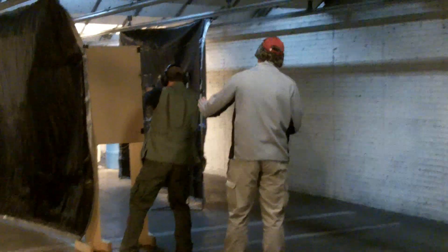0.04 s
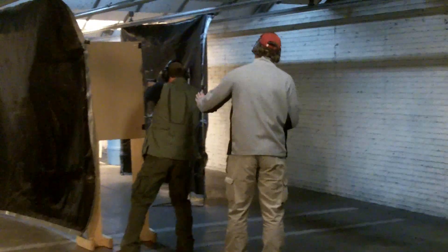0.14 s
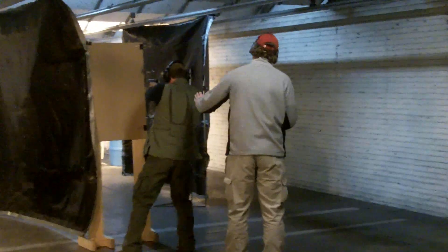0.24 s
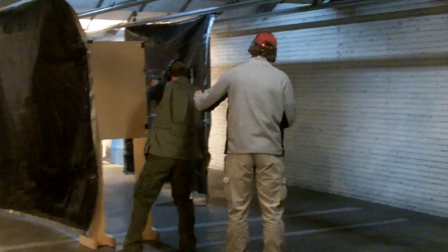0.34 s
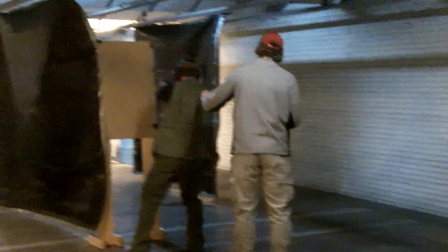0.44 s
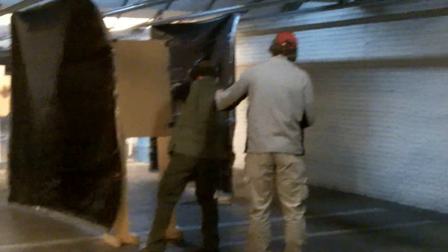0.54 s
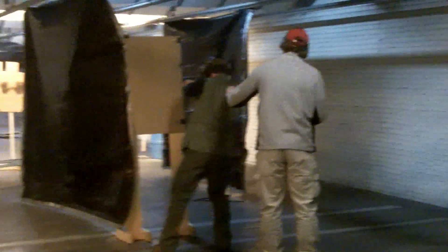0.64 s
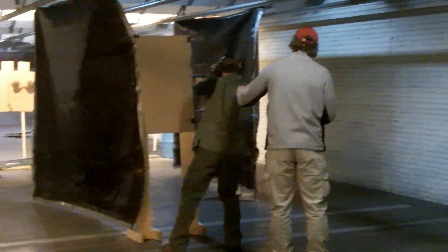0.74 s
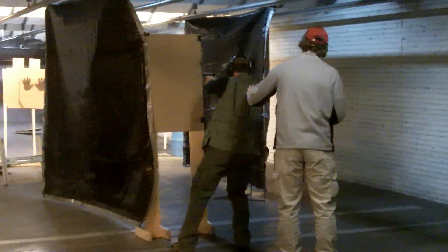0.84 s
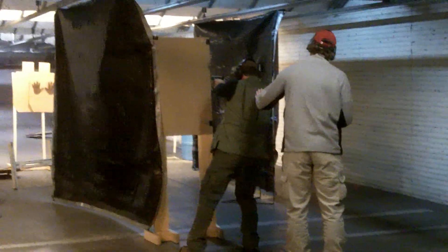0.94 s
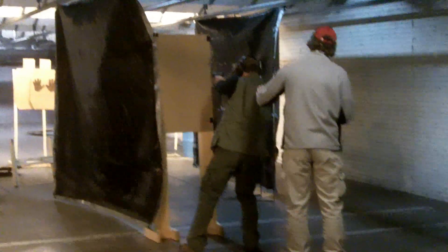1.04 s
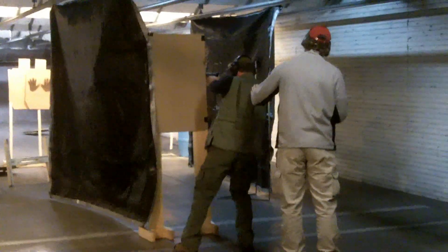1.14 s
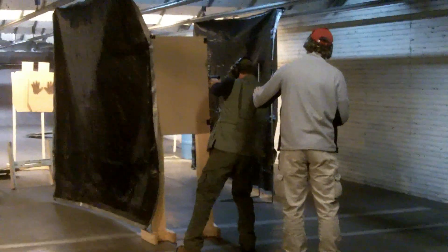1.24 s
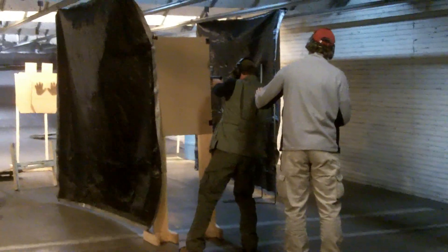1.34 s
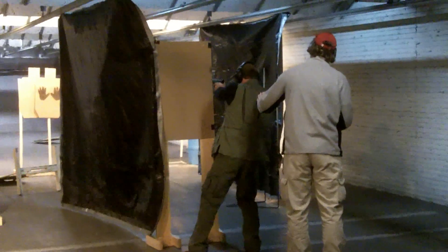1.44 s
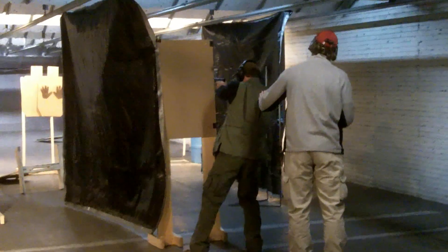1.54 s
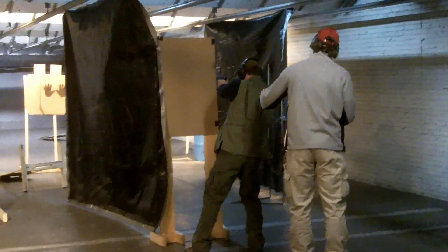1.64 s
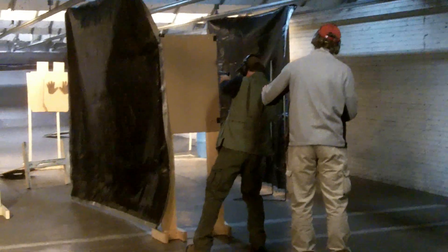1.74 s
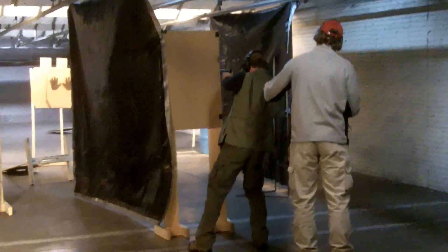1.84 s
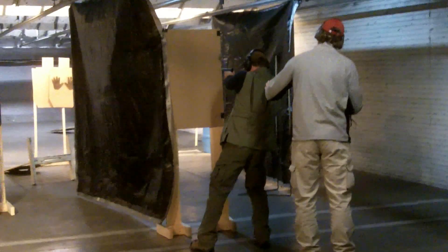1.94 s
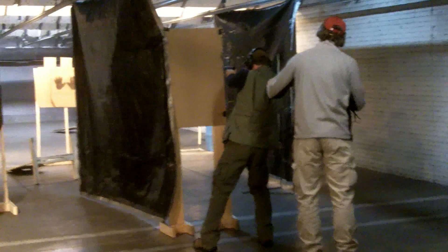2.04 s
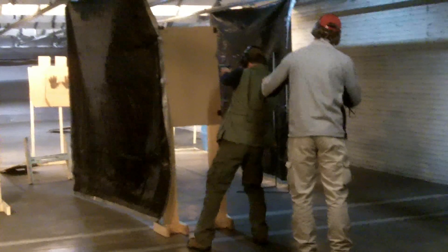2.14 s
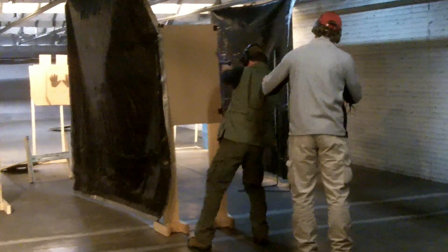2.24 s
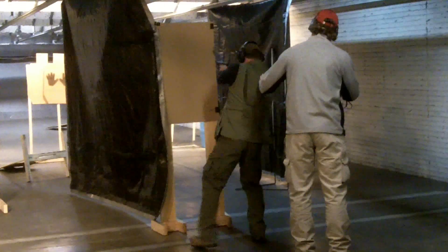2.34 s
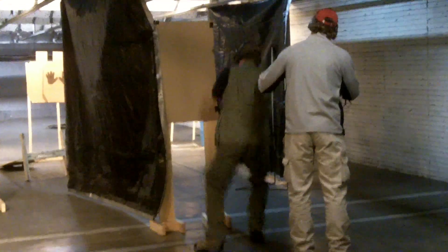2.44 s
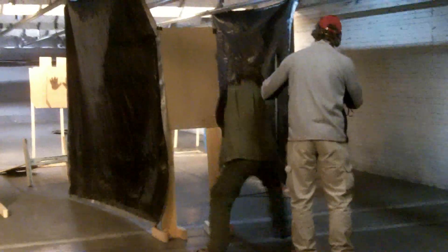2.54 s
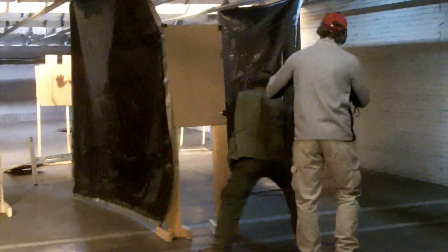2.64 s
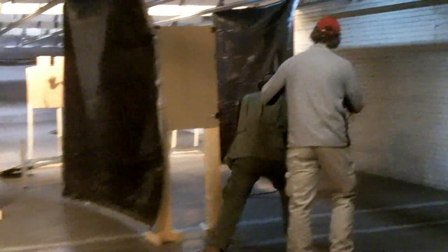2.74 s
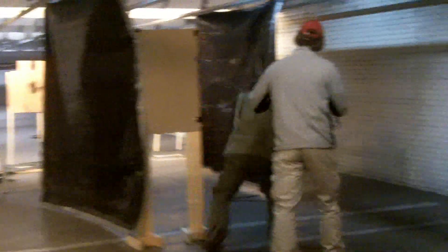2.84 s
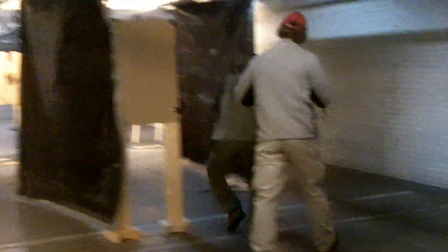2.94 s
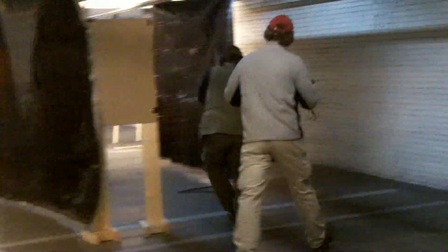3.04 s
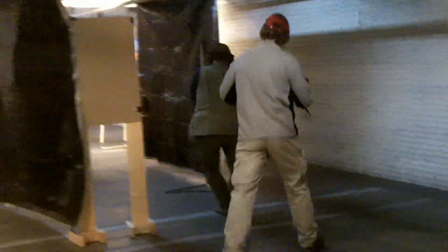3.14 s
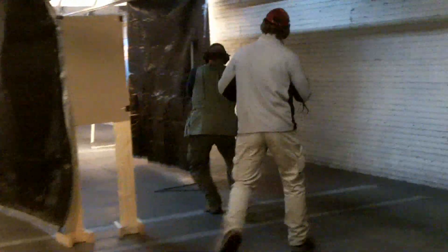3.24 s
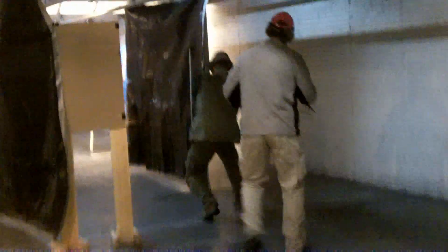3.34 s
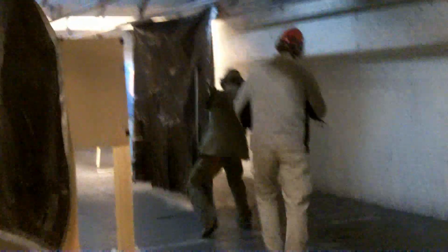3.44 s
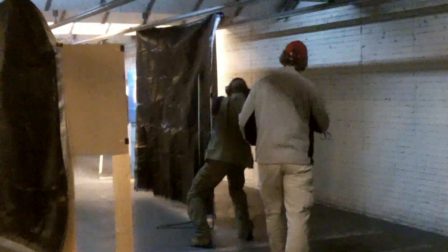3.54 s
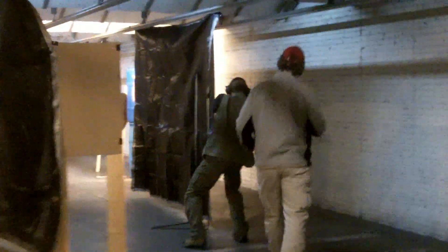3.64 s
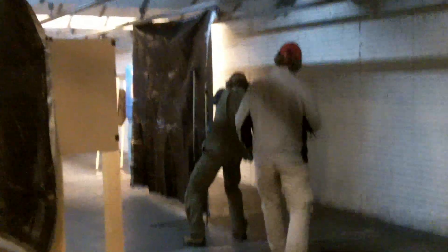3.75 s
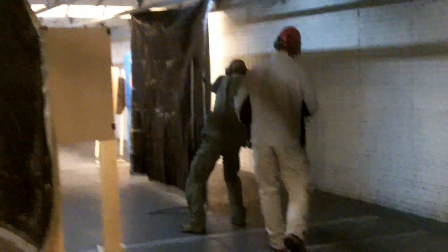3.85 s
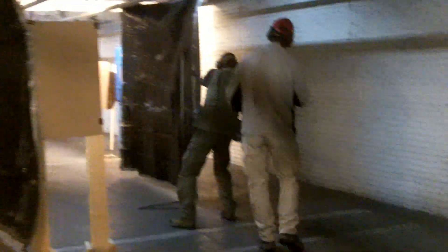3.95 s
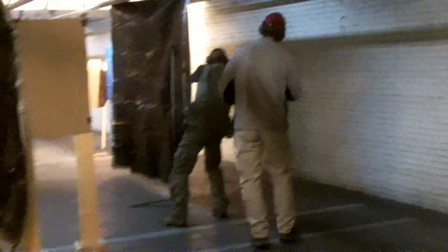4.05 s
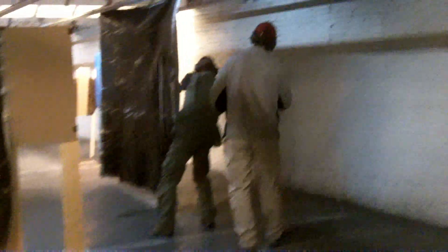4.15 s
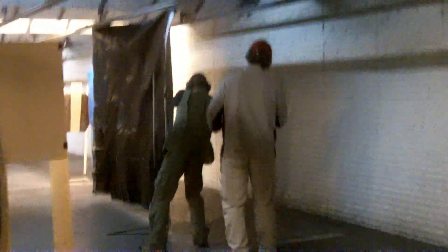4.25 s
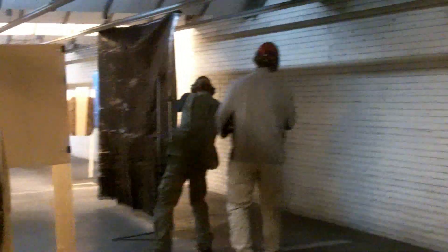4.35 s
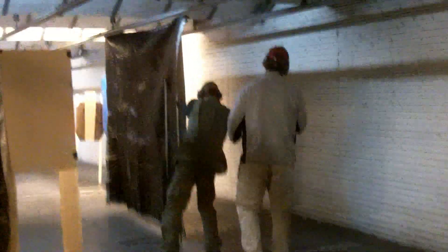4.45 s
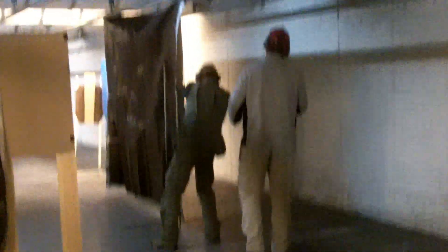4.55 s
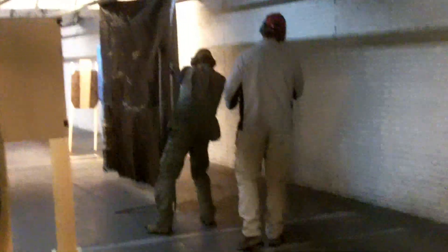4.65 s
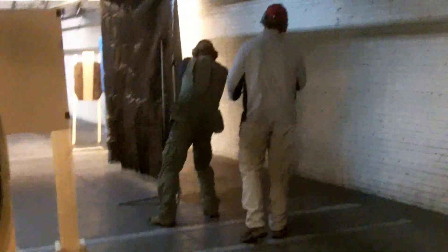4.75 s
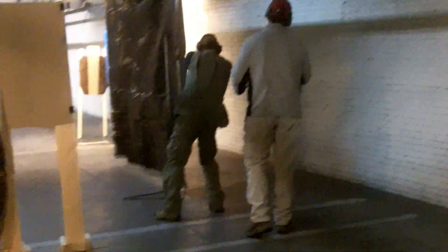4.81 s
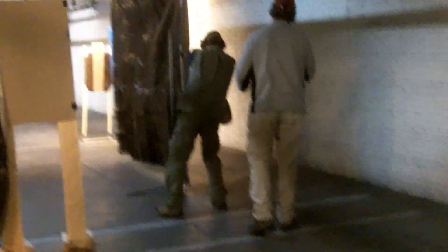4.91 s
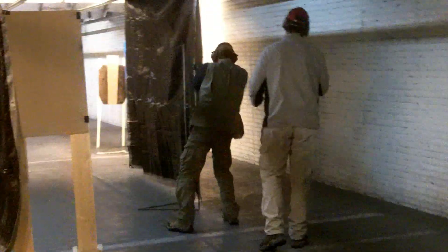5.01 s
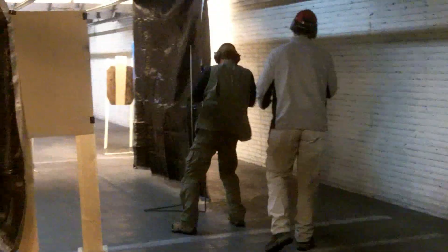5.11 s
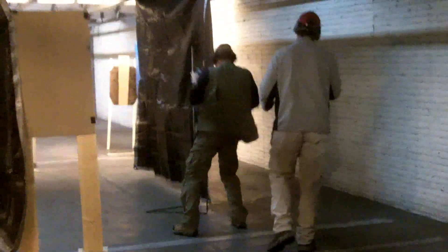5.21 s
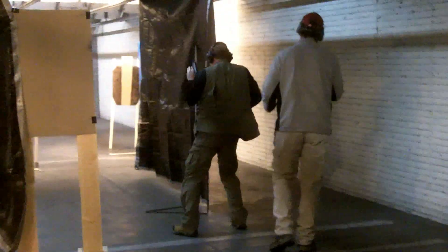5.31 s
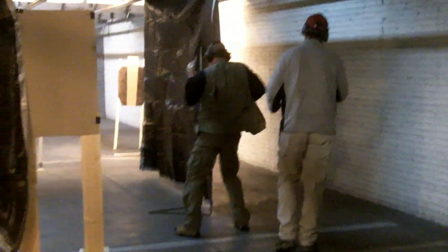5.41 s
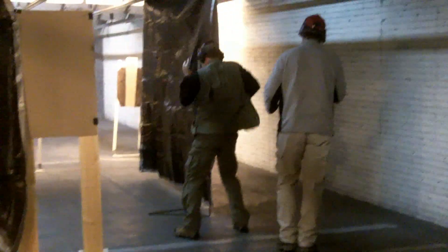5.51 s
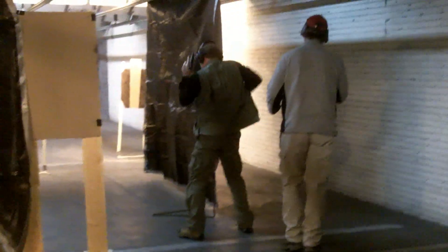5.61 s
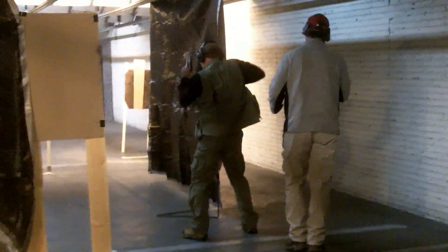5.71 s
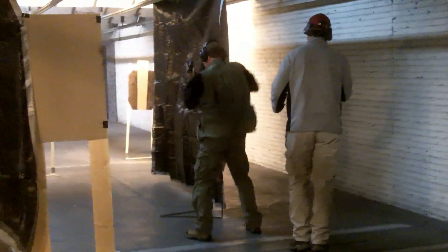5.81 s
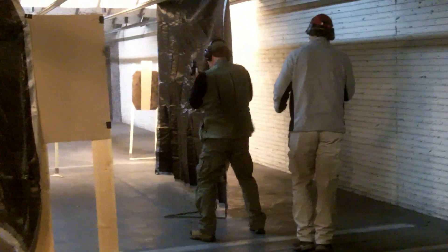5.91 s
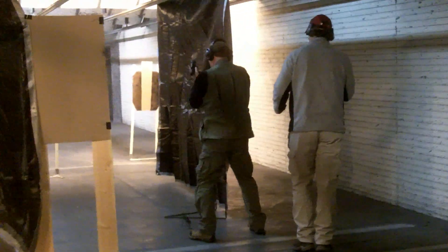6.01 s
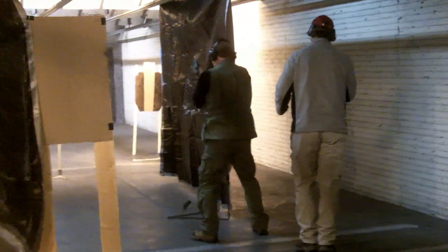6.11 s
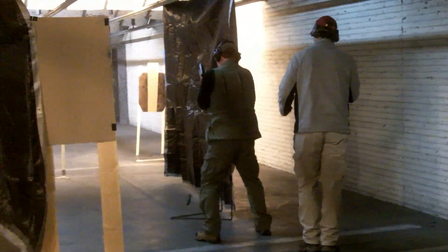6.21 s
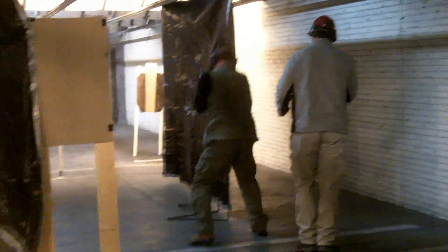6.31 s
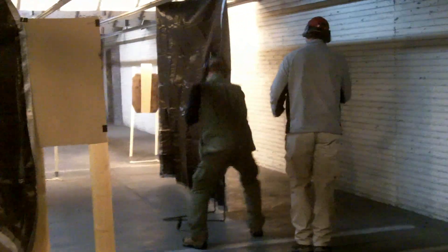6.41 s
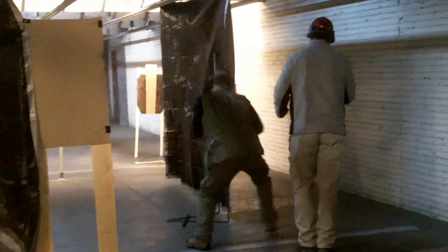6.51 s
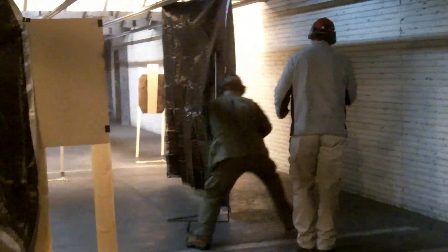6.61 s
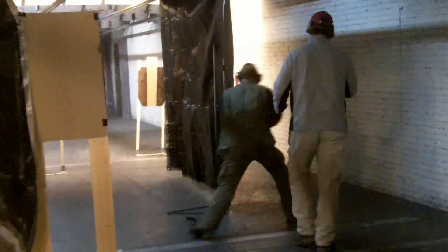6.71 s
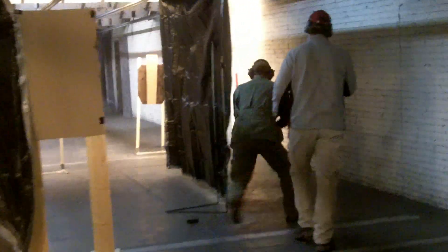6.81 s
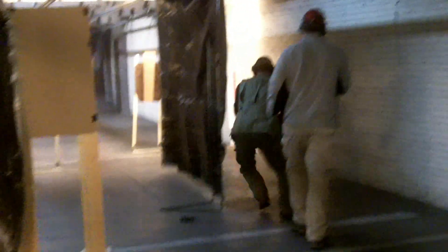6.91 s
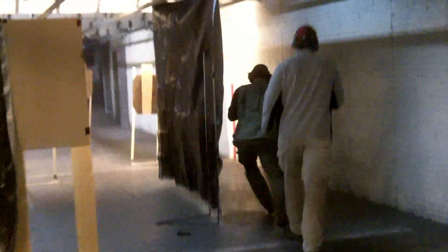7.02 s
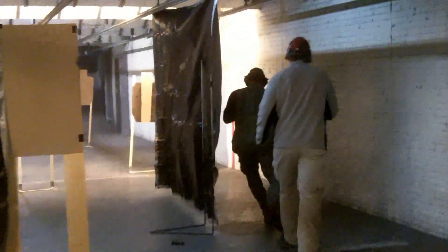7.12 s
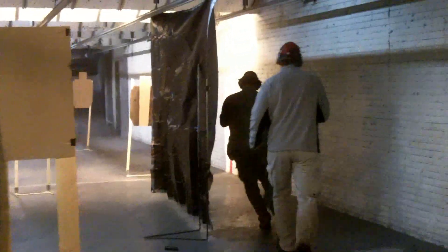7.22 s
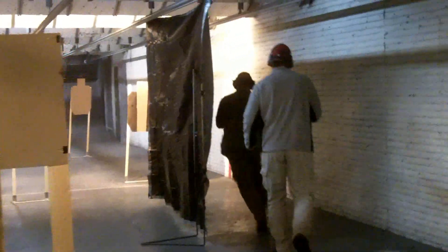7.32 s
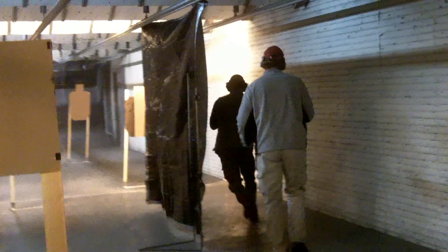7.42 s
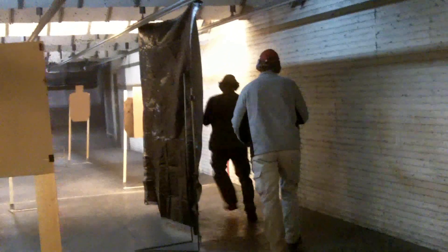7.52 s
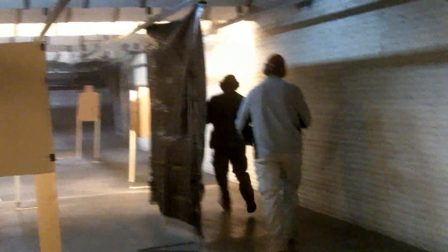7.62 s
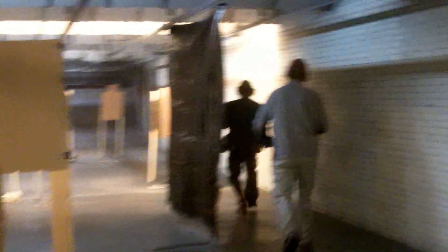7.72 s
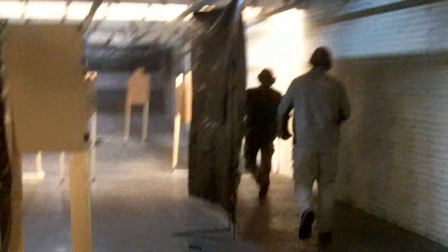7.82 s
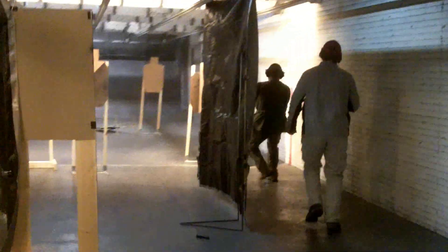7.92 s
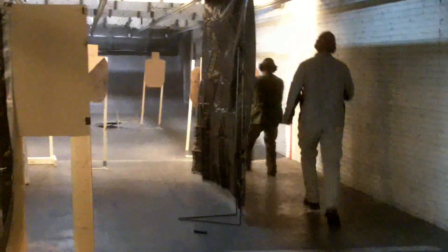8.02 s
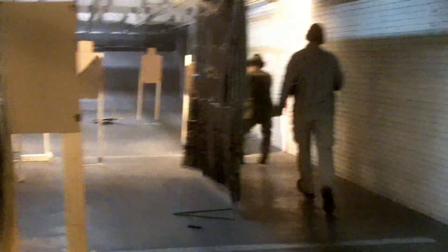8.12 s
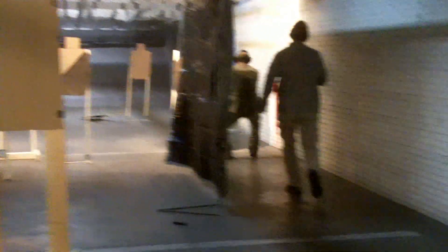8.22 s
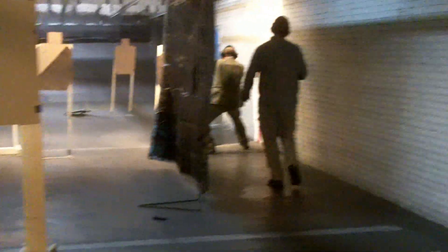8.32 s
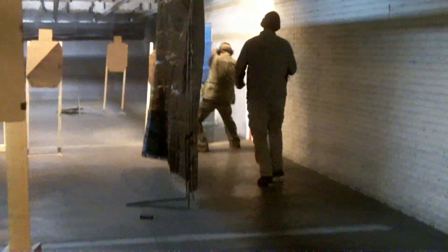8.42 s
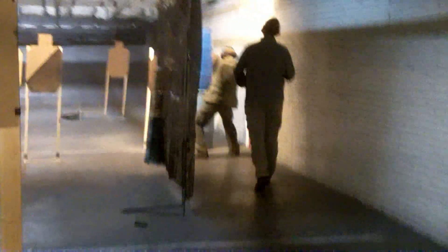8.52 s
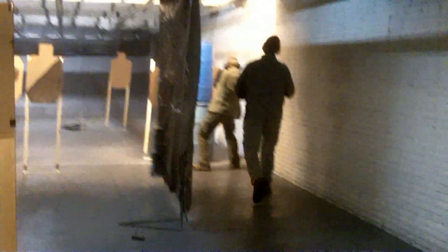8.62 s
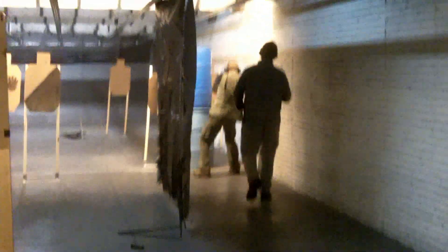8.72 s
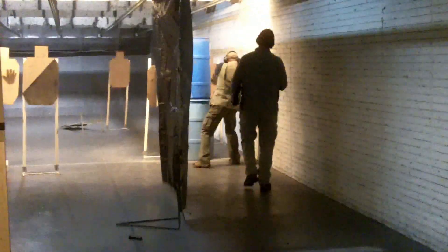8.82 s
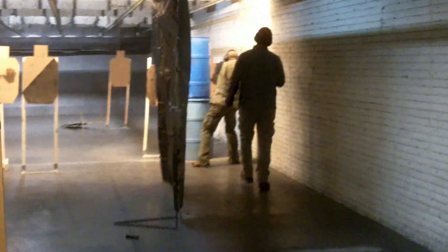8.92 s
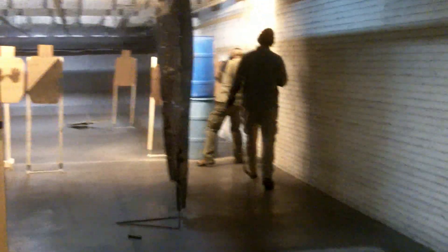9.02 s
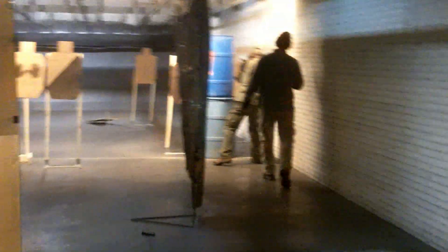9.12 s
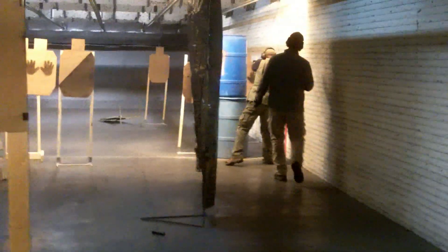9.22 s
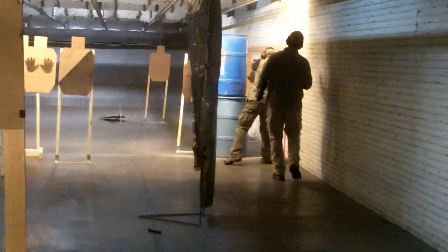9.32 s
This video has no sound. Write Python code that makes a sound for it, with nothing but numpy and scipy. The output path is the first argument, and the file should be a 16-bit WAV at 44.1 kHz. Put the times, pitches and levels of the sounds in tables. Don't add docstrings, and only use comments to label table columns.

```python
import sys
import numpy as np
from scipy import signal
from scipy.io import wavfile

SR = 44100
rng = np.random.default_rng(int(sys.argv[2]) if len(sys.argv) > 2 else 0)


def elevation(decibels):
    levels = np.asarray(decibels, float)
    return 10 ** (levels / 20)


def dump(signal):
    limited = np.clip(np.atleast_2d(signal).T, -1, 1)
    pcm = np.round(limited * 32767).astype(np.int16)
    wavfile.write(sys.argv[1], SR, pcm)


N = 412776

# start_s, peak_db, far_wall_slap_db, forerunner_db
PRIOR_SHOT = [
    (-0.048, 2.5, 0.5, -40),
]
SHOTS = [
    (0.5, 2.27, -2, -24.5),
    (1.854, 2.7, -2.5, -29),
    (2.368, 3.37, -2, -21),
    (4.332, 4.03, -1.5, -29),
    (4.753, 3.65, -11, -31),
    (5.018, 3.37, -5, -21.5),
    (9.275, 1.33, -7, -19),
]


def rms_one(x):
    return x / np.sqrt(np.mean(x ** 2) + 1e-20)


def bandpass(x, low_hz, high_hz, order):
    return signal.sosfilt(signal.butter(order, [low_hz, high_hz], "band", fs=SR, output="sos"), x)


def at_hz(points, hz, column=1):
    points = np.array(points)
    return np.interp(np.log(hz), np.log(points[:, 0]), points[:, column])


def clicks(start_s, sizes, size=N):
    out = np.full(size, 1e-18)
    np.add.at(out, np.round(np.asarray(start_s) * SR).astype(int), sizes)
    return out


def dying(power, t60_s):
    return signal.lfilter([1], [1, -elevation(-120 / (t60_s * SR))], power)


def ring(x, hz, t60_s):
    r = elevation(-60 / (t60_s * SR))
    w = 2 * np.pi * hz / SR
    return signal.lfilter([0, np.sin(w)], [1, -2 * r * np.cos(w), r * r], x)


def drift(rate_hz):
    knots_per_s = 40
    knots = rng.standard_normal(int(N / SR * knots_per_s) + 3)
    r = np.exp(-2 * np.pi * rate_hz / knots_per_s)
    smooth = rms_one(signal.lfilter([1], [1, -r], knots))
    return np.interp(np.arange(N) / SR * knots_per_s, np.arange(len(knots)), smooth)


def bands(size):
    white = rng.standard_normal((2, size))
    edges_hz = 18 * 2 ** (np.arange(31) / 3)
    for k, (low_hz, high_hz) in enumerate(zip(edges_hz, edges_hz[1:])):
        yield np.sqrt(low_hz * high_hz), bandpass(white[k % 2], low_hz, high_hz, 2)


def hall_power(hz, kicks):
    # band_hz, t60_s, slow_tail_db, build_up_s
    hall_decay = [(30, 1.1, -33, 0.011), (81.6, 0.39, -8, 0.005), (220, 1.45, -8.5, 0.024),
                  (606, 0.99, -13.5, 0.022), (1490, 0.96, -16.5, 0.019), (2930, 0.93, -26.5, 0.005),
                  (5530, 0.69, -50, 0.0049), (8100, 0.47, -43, 0.0035), (11820, 0.37, -59, .004),
                  (16200, 0.16, -64.5, .004)]
    t60_s, slow_db, rise_s = (at_hz(hall_decay, hz, column=k) for k in (1, 2, 3))
    slow_t60_ratio = 2.196
    decay = dying(kicks, t60_s) + elevation(2 * slow_db) * dying(kicks, slow_t60_ratio * t60_s)
    r = np.exp(-1 / (rise_s * SR))
    return signal.lfilter([1 - r], [1, -r], decay)


def shots():
    # band_hz, level_db_per_hz
    blast_low = [(20, -4), (60, -5.5), (140, -5.5), (230, -6), (400, -6), (600, -2.5), (850, -3.5),
                 (1200, -6), (1700, -10), (2400, -13), (3300, -19)]
    blast_top = [(5000, -18), (7000, -18.5), (10000, -21), (16000, -8.5)]
    slap_delay_s, slap_t60_s = 0.116, 0.033
    run_in = SR // 10
    start_s, peak_db, slap_db, early_db = np.transpose(list(PRIOR_SHOT) + list(SHOTS))
    start_s = start_s + run_in / SR
    size = N + run_in + SR // 5
    power = elevation(2 * peak_db)
    diffuse = 0
    for hz, band in bands(size):
        tint = np.minimum(hz / 3000, 6000 / hz)
        slap_kicks = clicks(start_s + slap_delay_s, power * elevation(2 * slap_db) * tint, size=size)
        total = hall_power(hz, clicks(start_s, power, size=size)) + dying(slap_kicks, slap_t60_s)
        diffuse = diffuse + elevation(at_hz(list(blast_low) + list(blast_top), hz)) * band * np.sqrt(total)
    n_wave = np.linspace(1, -1, 26)
    blast = np.convolve(clicks(start_s, elevation(peak_db), size=size), n_wave)[:size]
    swell = dying(clicks(start_s, elevation(2 * early_db), size=size)[::-1], 0.048)[::-1]
    early = bandpass(rng.standard_normal(size), 500, 3000, 2) * np.sqrt(swell)
    return (elevation(19.0) * diffuse + elevation(-1) * blast + elevation(3) * early)[run_in:run_in + N]


def rumble_dip_db():
    dip_db, hold_s, ease_db_s = 8, 0.45, 20.5
    shot_s = np.array(list(PRIOR_SHOT) + list(SHOTS))[:, 0]
    t = np.arange(N) / SR
    since_s = t - shot_s[np.searchsorted(shot_s, t) - 1]
    return np.clip(dip_db - ease_db_s * (since_s - hold_s), 0, dip_db)


def ventilation():
    # band_hz, level_db_per_hz
    air_low = [(60, -40), (100, -4.5), (150, -8), (220, 0), (290, -16.5), (400, -30.5), (600, -29.5),
               (850, -32), (1200, -34.5), (2000, -36), (3300, -51.5)]
    air_top = [(5000, -47.5), (7000, -51.5), (10000, -61.5), (16000, -65.5)]
    # mode_hz, width_hz, level_db
    ducts = [(219.46, 8.8, -3), (114.5, 7.6, -10.5), (760, 14, -27)]
    # time_s, handling_db, ventilation_db
    carried = [
        (0, -41, -19.5),
        (1.5, -36.5, -29),
        (3.199, -36, -32),
        (4.0, -32, -27),
        (5.8, -37.5, -26),
        (6.598, -34, -30),
        (7.2, -30.5, -27.5),
        (8.1, -32, -26),
        (9.36, -31, -29.5),
    ]
    time_s, hands_db, air_db = np.transpose(carried)
    t = np.arange(N) / SR
    hands_db, air_db = (np.interp(t, time_s, db) for db in (hands_db, air_db))
    air = 0
    for hz, band in bands(N):
        wander_db = 2.85 * drift(1.7) * (hz < 400)
        air = air + elevation(at_hz(list(air_low) + list(air_top), hz) + wander_db) * band
    air = rms_one(air)
    for hz, width_hz, level_db in ducts:
        t60_s = 3.7 / width_hz
        tone = ring(ring(rng.standard_normal(N), hz, t60_s), hz, t60_s)
        air += elevation(level_db + 1.1 * drift(1.5)) * rms_one(tone)
    hands = rms_one(bandpass(rng.standard_normal(N), 18, 75, 2))
    hands_db = hands_db - rumble_dip_db() + 1.8 * drift(3.3)
    return elevation(air_db - 3.5) * air + elevation(hands_db) * hands


def cases():
    # start_s, peak_db
    ticks = [(1.207, -36), (1.217, -34), (1.235, -40), (1.325, -44), (1.3503, -52), (1.4856, -48),
             (1.617, -44), (1.716, -29), (1.727, -33), (3.0894, -47), (3.153, -34.5), (3.486, -44),
             (3.517, -39.5), (3.811, -41), (3.870, -30.5), (3.9294, -50), (5.702, -42), (5.9615, -26),
             (6.127, -39), (6.355, -17), (6.498, -36), (6.572, -20), (6.729, -25.5), (6.739, -33),
             (6.9461, -31), (7.2374, -43), (7.7, -35), (8.4602, -47), (9.165, -41), (9.179, -42)]
    # (start_s, peak_db)
    tubes = [
        (10800, [(1.4865, -58), (1.6332, -57), (1.6886, -51), (1.728, -44), (1.7873, -45)]),
        (10750, [(3.0914, -43), (3.1552, -51), (3.4874, -41), (3.5184, -47), (3.7184, -54), (3.7564, -46), (3.8107, -39), (3.931, -39), (4.1505, -57), (4.2394, -58)]),
        (10540, [(5.462, -50), (6.1285, -36), (6.19, -60), (6.5644, -37), (6.633, -56), (6.8284, -39), (6.995, -45), (7.3094, -53)]),
        (10000, [(5.9623, -54), (6.4996, -44), (6.755, -65), (6.9511, -34), (7.017, -55), (7.1412, -45), (7.2514, -55)]),
    ]
    # start_s, peak_db, mode_hz
    upper_rings = [
        (1.73, -53, 12000),
        (4.135, -58, 11650),
        (4.14, -64, 8740),
        (3.565, -64, 6840),
        (7.4, -51, 5060),
    ]
    ring_t60_s, strike_s, beat_hz = 0.25, 0.0018, 55
    start_s, peak_db = np.transpose(ticks)
    crack = bandpass(rng.standard_normal(N), 4700, 6800, 2)
    crack += elevation(-10.5) * bandpass(rng.standard_normal(N), 2500, 13000, 1)
    tick = crack * np.sqrt(dying(clicks(start_s, elevation(2 * peak_db + 6)), 0.03))

    strikes = []
    for hz, bounces in tubes:
        stops = [later[0] for later in bounces[1:]] + [N / SR]
        strikes += [(s, db, hz, stop) for (s, db), stop in zip(bounces, stops)]
    strikes += [(*row, N / SR) for row in upper_rings]
    rings = np.zeros(N)
    for (s, db, hz, stop), c in zip(strikes, rng.random((len(strikes), 6))):
        t = np.arange(min(round((stop - s) * SR), SR // 2)) / SR
        modes = 0
        for k in range(3):
            phase = 2 * np.pi * ((hz + beat_hz * (k - 1)) * t + c[k + 3])
            modes = modes + np.sqrt(c[k]) * np.sin(phase)
        edges = np.clip(np.minimum(t, stop - s - t) / strike_s, 0, 1)
        rings[round(s * SR):][:len(t)] += elevation(db - 60 * t / ring_t60_s) * modes * edges
    return tick + elevation(1.0) * rings, elevation(-1.5) * tick + elevation(1.5) * rings


def boots():
    # start_s, length_s, level_db
    scuffs = [(3.695, .025, -41), (3.745, .03, -45), (3.79, .05, -49), (4.19, .08, -53), (4.315, .02, -42),
              (6.363, .015, -18.5), (6.66, 0.091, -39), (6.87, .1, -40), (7.097, 0.072, -39.5),
              (7.24, .05, -36.5), (7.364, 0.076, -38)]
    # start_s, peak_db
    steps = [
        (3.87, -48),
        (4.157, -48),
        (7.646, -40.5),
        (7.884, -38.5),
        (8.076, -35),
        (8.12, -48),
        (8.53, -49.5),
        (8.775, -42),
    ]
    rise_db_s, fall_db_s = 1498, 249
    start_s, peak_db = np.transpose(steps)
    knock = bandpass(rng.standard_normal(N), 500, 2900, 3)
    knock *= np.sqrt(dying(clicks(start_s, elevation(2 * peak_db)), 0.1))

    grain_db = 4 * np.minimum(rng.exponential(1, N), 3) * (rng.random(N) < 0.05)
    grit = rms_one(bandpass(rng.standard_normal(N) * elevation(grain_db), 1800, 8000, 2))
    t = np.arange(N) / SR
    grit += elevation(-5) * rms_one(ring(grit, 2276, 0.08)) * (t > 7)
    drag = 0
    for s, length_s, db in scuffs:
        rise_db = rise_db_s * np.maximum(s - t, 0)
        fall_db = fall_db_s * np.maximum(t - s - length_s, 0)
        drag = drag + elevation(db - rise_db - fall_db)
    grit *= drag
    return elevation(6.0) * knock + elevation(-9) * grit, elevation(8) * knock + elevation(-16.5) * grit


def magazine():
    # start_s, peak_db, low_mode_hz, low_mode_db
    bounces = [(6.1898, -16, 2120, 1), (6.1965, -6.5, 3290, -5), (6.2048, -14, 2200, 0),
               (6.214, -22, 2290, -6), (6.3812, -10, 1625, -2.5), (6.387, -7, 1540, -7),
               (6.3932, -12, 1770, -3), (6.6328, -16, 2270, 1), (6.642, -17, 1950, -1.5),
               (6.8276, -15, 905, -8.5), (6.8355, -17, 2260, -5), (6.849, -25, 2000, -5),
               (7.0168, -11.5, 1014, -11), (7.0302, -18, 2260, -14), (7.2489, -29, 2270, -1)]
    # mode_hz, level_db, t60_s
    shell = [(2270, -26, 0.13), (2620, -8, 0.024), (3380, -12, 0.044), (4990, -40, 0.0043),
             (5800, -5, 0.039), (6450, 0.5, 0.049), (6740, 9, .012), (8100, 5, .015), (8660, -27, 0.0085),
             (11100, -8, .01)]
    low_t60_s, rattle_t60_s, size = 0.047, 0.099, 4096
    hall_db, skid_away_db_s = -4, 1
    dry = np.zeros(N)
    chance = rng.standard_normal((len(bounces), 2, len(shell)))
    rattle = bandpass(rng.standard_normal((len(bounces), size)), 900, 9000, 1)
    kick = clicks([0], 0.52, size=size)
    for (s, db, low_hz, low_db), (loud, shift), noise in zip(bounces, chance, rattle):
        modes = 0
        for (hz, mode_db, t60_s), c, d in zip(shell, loud, shift):
            modes = modes + elevation(mode_db + 3 * c) * ring(kick, hz * (1 + 0.03 * d), t60_s)
        hit = elevation(-16) * modes
        hit += elevation(low_db + 0.5) * ring(kick, low_hz, low_t60_s)
        hit += elevation(2.0) * noise * dying(kick, rattle_t60_s)
        dry[round(s * SR):][:size] += elevation(db) * hit
    since_s = np.arange(N) / SR - bounces[0][0]
    return elevation(-0.5) * dry, elevation(hall_db + skid_away_db_s * since_s) * dry


def hall(x):
    kick = clicks([0.003], 1, size=SR)
    answer = sum(band * np.sqrt(hall_power(hz, kick)) for hz, band in bands(SR))
    return signal.oaconvolve(x, answer / np.sqrt(np.sum(answer ** 2)))[:N]


def scene():
    case, case_feed = cases()
    boot, boot_feed = boots()
    steel, steel_feed = magazine()
    small = case + boot + steel + hall(case_feed + boot_feed + steel_feed)
    return (shots() + ventilation() + small)[None]


def top_cut(x):
    return signal.sosfilt(signal.butter(12, 16470, fs=SR, output="sos"), x)


def record(dry):
    x = signal.lfilter(*signal.iirnotch(4250, 2.2, fs=SR), dry)
    x = x + elevation(4.0) * signal.lfilter(*signal.iirpeak(6050, 4.5, fs=SR), x)
    x = signal.sosfilt(signal.butter(2, 7500, fs=SR, output="sos"), x)

    over_db = np.clip(20 * np.log10(np.abs(x[0]) + 1e-9) + 14, 0, 9.0)
    over_db[0] = over_db.max()
    creep_db = 11.16 * np.arange(N) / SR
    drop_db = np.maximum.accumulate(over_db + creep_db) - creep_db
    smooth_db = signal.lfilter([0.008], [1, -0.992], drop_db, zi=[drop_db[0]])[0]
    x = x * elevation(-smooth_db)

    x = np.clip(x, -1.15, 0.84)
    x = x + elevation(-79.5) * rng.standard_normal(x.shape)
    x = signal.lfilter(*signal.butter(1, 16, "high", fs=SR), x)
    x = np.clip(x, -1.03, 1.03)
    x = signal.sosfilt(signal.cheby2(14, 45, 15700, fs=SR, output="sos"), x)
    return top_cut(x)


dry = scene()
out = record(dry)
dump(out)
```